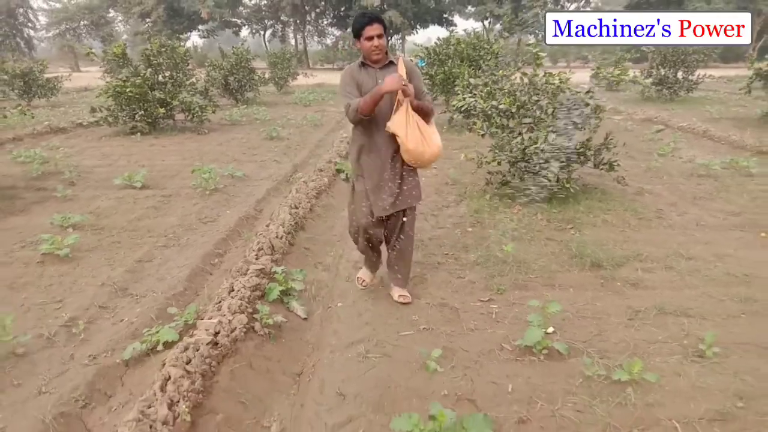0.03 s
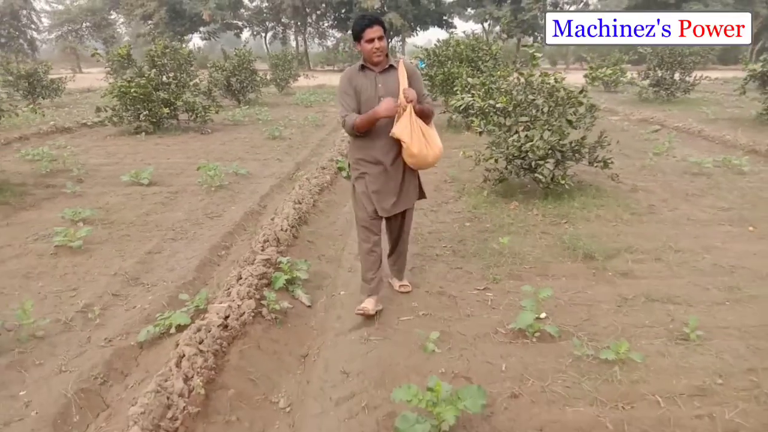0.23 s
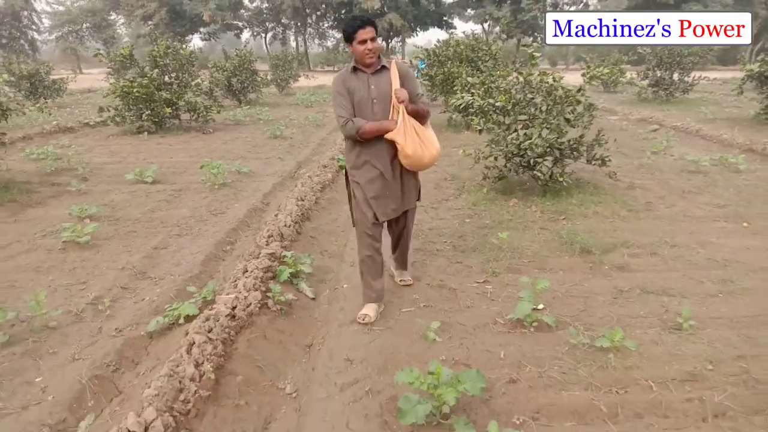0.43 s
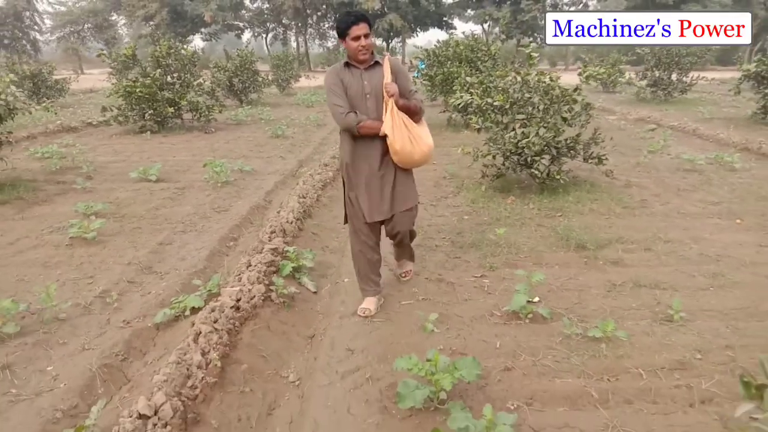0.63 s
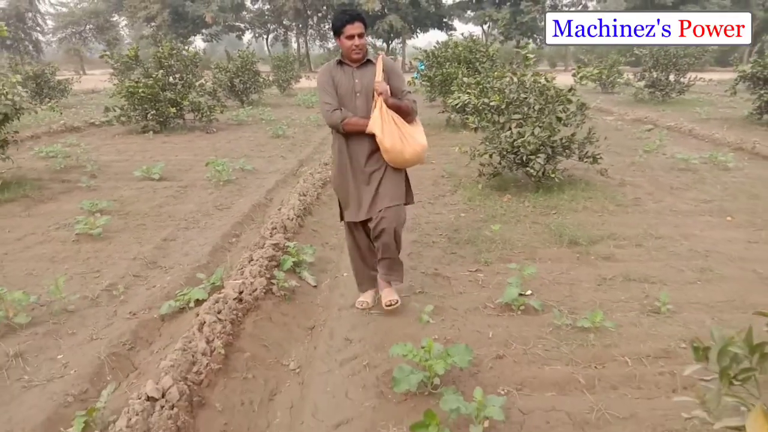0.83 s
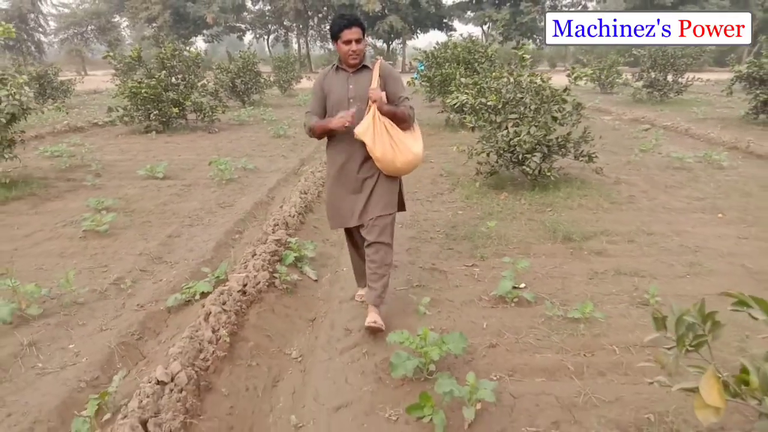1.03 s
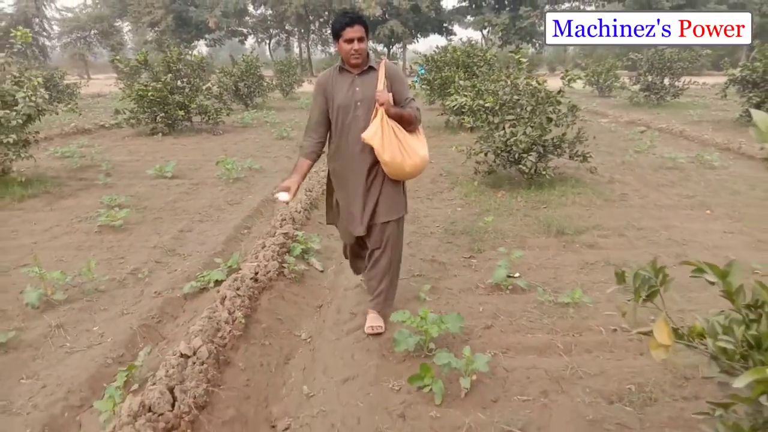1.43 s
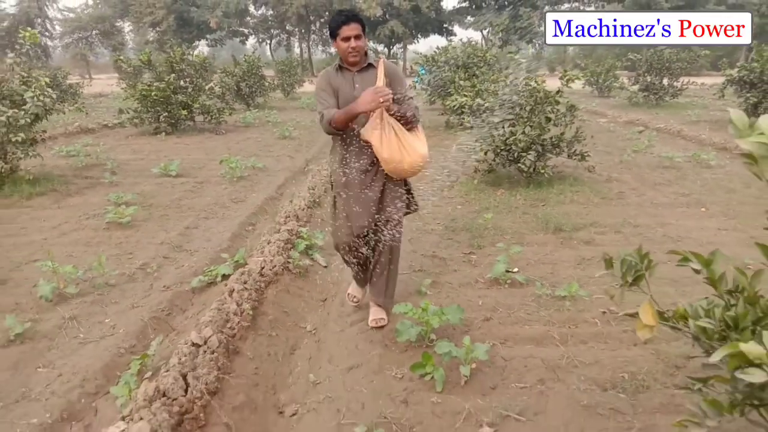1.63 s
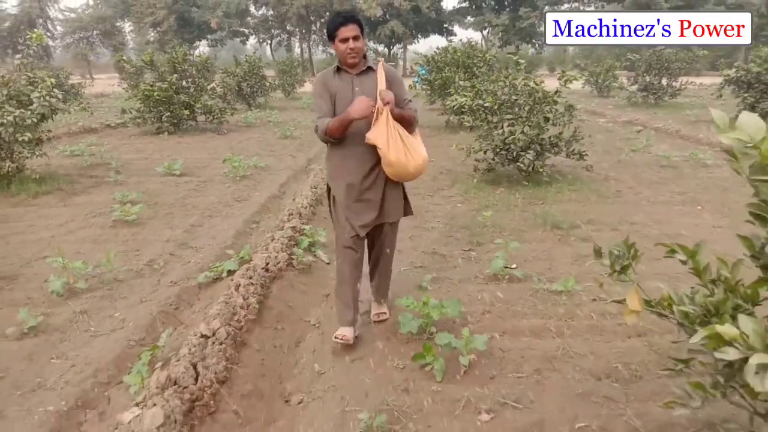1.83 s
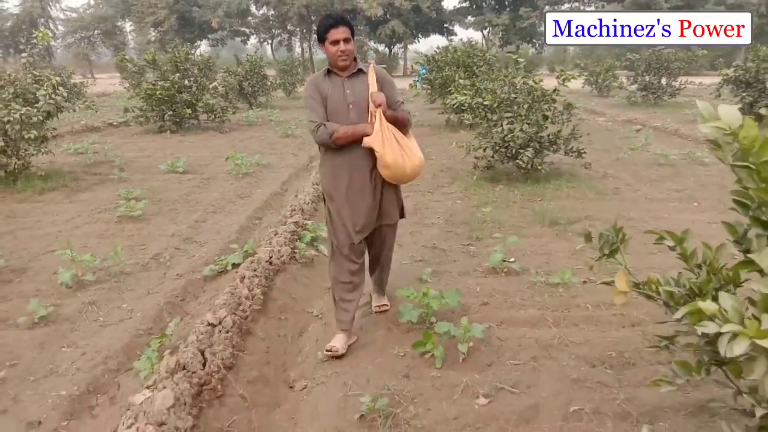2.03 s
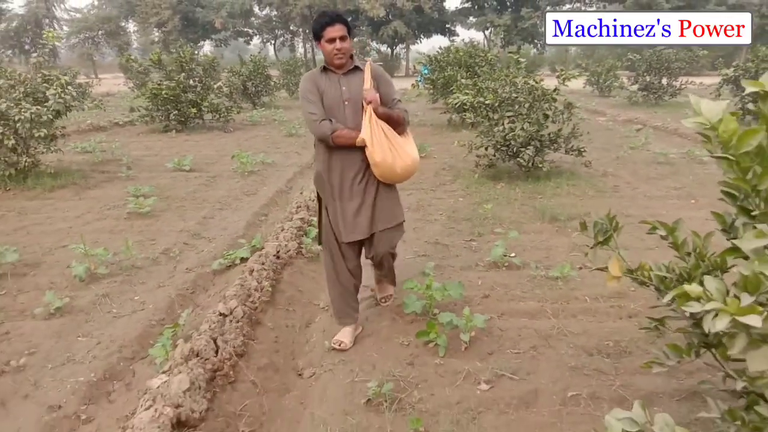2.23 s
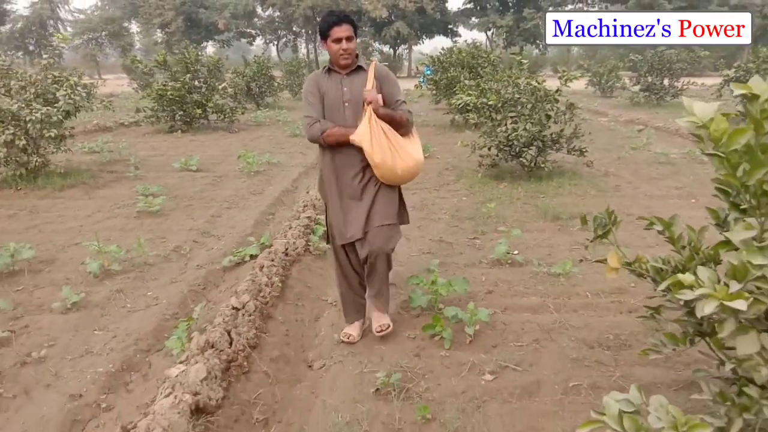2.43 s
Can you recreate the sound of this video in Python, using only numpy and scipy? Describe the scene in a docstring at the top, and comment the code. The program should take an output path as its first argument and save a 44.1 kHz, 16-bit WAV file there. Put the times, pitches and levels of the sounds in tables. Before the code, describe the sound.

Fertiliser granules thrown by hand patter on soil and leaves, a distant engine thudding.

```python
"""On a field, a farmer throws two handfuls of fertiliser granules, which patter on soil and leaves.
The patter is thousands of tiny random hits. A few granules land close by with a sharp tick,
and some knock on a camera, whose body rings hollowly. His soft steps thump and scuff.
Far off, a single-cylinder engine thuds steadily over a low rumble and quiet open air."""
import sys
import numpy as np
from scipy import signal
from scipy.io import wavfile

SR = 44100
rng = np.random.default_rng(int(sys.argv[2]) if len(sys.argv) > 2 else 0)


def materialize(psi):
    """Save the field psi as 16-bit PCM at rate SR to the path in sys.argv[1].

    A 1-D psi becomes a single channel; in a 2-D psi each row is a channel.
    """
    bounded = np.clip(np.atleast_2d(psi).T, -1, 1)
    quanta = np.round(bounded * 32767).astype(np.int16)
    wavfile.write(sys.argv[1], SR, quanta)


N = 110250

# tone of the low background rumble: pitch_hz, level_db
RUMBLE_TONE = [(20, -14), (42, -18), (55, -23), (68, 2.5), (90, 6), (150, -23), (210, -7.5), (400, -16.5),
               (900, -40.5)]
# tone of the open air: pitch_hz, level_db
AIR_TONE = [(100, -2), (400, 2.5), (800, -2), (3000, -11.5), (5000, -10.5), (9000, -25), (15000, -37)]
# tone of the faint noise that gives the background width: pitch_hz, level_db
WIDTH_TONE = [(25, 4), (80, 0.5), (160, -8), (350, -8.5), (1300, -11), (2500, -32), (6000, -31.5),
              (15000, -42)]
# the two exhaust thuds of each engine cycle: delay_s, start_hz, end_hz, rise_s, decay_s, level_db
THUDS = [(0, 353, 79, 0.0024, 0.0083, -32), (.0213, 297, 150.7, 0.0046, 0.016, -33)]
# tone of the engine's low boom: pitch_hz, level_db
BOOM_TONE = [(20, -19), (48, -22), (68, 3.5), (100, -1.5), (150, -6.5), (220, -16.5), (500, -24),
             (900, -46.5)]
# the engine's loudness drifting with distance and air: time_s, gain_db
ENGINE_DRIFT = [(0, -1), (.35, 3), (.65, 1), (1.02, 2), (1.2, 1.5), (1.38, 0), (1.55, 2), (1.649, -1.5),
                (1.9, 2), (2.15, 3.5), (2.3, 1.5), (2.5, 4)]
# soft steps on loose soil: start_s, thump_db, scuff_db
STEPS = [(.325, -41.5, -50), (.868, -47, -58.5), (1.586, -52, -64), (2.173, -65, -44)]
# tone of a sole scuffing the soil: pitch_hz, level_db
SCUFF_TONE = [(150, -23), (400, -5.5), (800, -2), (1500, -0.5), (3000, -1), (8000, -35)]
# granules knocking on the camera: start_s, level_db, low_cut_hz
KNOCKS = [(0.0964, -27.5, 200), (.1412, -38.5, 500), (0.7, -26.5, 1080), (0.894, -33, 250),
          (1.316, -20, 174), (1.977, -28.5, 700), (2.353, -35.5, 1000)]
# the notes its body rings at: pitch_hz, level_db, ring_s (time to fade by 60 dB)
BODY_NOTES = [(140, 4, 0.017), (420, -13, 0.026), (730, -4.5, 0.0046), (1283, -4.5, 0.036),
              (1560, -0.5, 0.0076), (1870, -10, 0.011), (3170, -5, 0.047)]
# granules landing close by: start_s, level_db, pitch_hz, sharpness (higher rings longer)
TICKS = [(0.1949, -19, 3150, 2.7), (0.698, -9.5, 5200, 1.6), (0.7755, -22, 6050, 3.4),
         (0.8851, -37, 3230, 5), (1.0014, -43, 3280, 5), (1.1245, -19.5, 3230, 2.3),
         (1.3166, -24.5, 5400, 4.3), (1.382, -27, 3340, 4.5), (1.5973, -31, 3330, 13),
         (1.677, -40, 4010, 1.9), (1.757, -19, 3350, 4.5), (1.771, -27, 3500, 4), (2.007, -14, 4460, 1.3),
         (2.0098, -16, 4300, 2.5), (2.0196, -9, 5300, 2.1), (2.0359, -9.5, 5250, 4.8),
         (2.0393, -39, 5360, 3), (2.1314, -21, 3860, 3.4), (2.1471, -18, 4900, 4), (2.151, -17.5, 5400, 2),
         (2.1625, -22, 3900, 4.7), (2.169, -13.5, 5000, 2), (2.2704, -24, 3200, 2.8),
         (2.3189, -22, 3360, 14), (2.353, -46, 3360, 2)]
# tone of granules hitting soil: pitch_hz, level_db
SOIL_TONE = [(260, -56), (450, -16.5), (616, -7), (715, -11), (1170, -5), (1280, 1), (1600, -7.5),
             (1750, -3.5), (1920, -5), (3380, 1), (3700, -9.5), (4360, -5.5), (6150, 0), (7250, -7.5),
             (8170, -17), (10500, -12), (13600, -22), (14800, -8.5), (16000, -22)]
# tone of granules hitting leaves: pitch_hz, level_db
LEAF_TONE = [(260, -31), (450, -11), (771, -16), (979, -12.5), (1170, -18), (1280, -11), (1420, -21),
             (3540, 2), (4700, -19.5), (6150, -10.5), (8670, -28.5), (13200, -26.5), (15100, -26),
             (16000, -25)]
# showers of granules: start_s, rise_s, hold_s, fall_db_per_s, level_db, peak_hits_per_s, leaf_share (0-1)
SHOWERS = [(0.191, 0.074, 0.11, 58.5, -31, 8300, 0.07), (0.605, 0.17, 0.16, 24, -44.5, 2400, 0.18),
           (1.761, .014, 0.013, 173, -32.5, 2900, 0.94), (1.772, 0.056, .04, 34.5, -39, 1600, 0.16),
           (2.117, 0.067, 0.75, 17, -53.5, 830, 0.6)]


def amp(db):
    """Turns decibels into a factor to multiply a sound by."""
    return 10 ** (np.asarray(db) / 20)


def unit(x):
    """Scales a sound to an average power of 1."""
    return x / np.sqrt(np.mean(x ** 2) + 1e-20)


def seconds(size):
    """The time of each sample in a sound."""
    return np.arange(size) / SR


def add(mix, start_s, sound):
    """Adds a sound to the mix at the given time."""
    part = mix[max(round(start_s * SR), 0):][:len(sound)]
    part += sound[:len(part)]


def ring(x, hz, sharpness):
    """Makes a sound ring around one pitch."""
    return signal.lfilter(*signal.iirpeak(hz, sharpness, SR), x)


def colour(x, tone, size=4096):
    """Filters a sound to follow a tone table; plain noise keeps its overall power."""
    table_hz, table_db = np.transpose(tone)
    hz = abs(np.fft.fftfreq(size, 1 / SR))
    log_gain = np.log(amp(np.interp(np.log(hz + 1), np.log(table_hz + 1), table_db)))
    spectrum = np.exp(np.conj(signal.hilbert(log_gain)))  # so nothing sounds before its hit
    response = np.fft.ifft(spectrum).real[:size // 2]
    return signal.oaconvolve(x, response / np.linalg.norm(response))[:len(x)]


def linger(power, decay_s):
    """Spreads each spike of power into a fading tail with the same energy."""
    kept = np.exp(-2 / (decay_s * SR))
    return signal.lfilter([1 - kept], [1, -kept], power)


def swell(t, peak_s):
    """Rises to 1 at peak_s, then dies away."""
    return t / peak_s * np.exp(1 - t / peak_s)


def open_air(level_db=-67):
    """Steady noise makes a low rumble and the hush of the field."""
    rumble = colour(rng.standard_normal(N), RUMBLE_TONE)
    air = colour(rng.standard_normal(N), AIR_TONE)
    return amp(level_db) * (rumble + air)


def engine(first_s=0.01795, cycle_s=0.07535, glide_s=0.0023, clank_hz=1244, clatter_hz=2650):
    """Each cycle brings two exhaust thuds that drop in pitch, a boom, a metal clank and faint clatter."""
    out, t = np.zeros(N), seconds(5000)
    for start_s in np.arange(first_s, N / SR, cycle_s):
        for delay_s, start_hz, end_hz, rise_s, decay_s, db in THUDS:
            extra_db, detune = rng.normal(0, 1.07), rng.normal(0, 0.011)  # no two thuds are alike
            hz = (end_hz + (start_hz - end_hz) * np.exp(-t / glide_s)) * (1 + detune)
            shape = (1 - np.exp(-t / rise_s)) * np.exp(-t / decay_s)
            thud = shape * np.sin(2 * np.pi * np.cumsum(hz) / SR)
            add(out, start_s + delay_s, amp(db + extra_db) * thud)
        clank_noise, clatter_noise, boom_noise = rng.standard_normal((3, len(t)))
        clank = unit(ring(ring(clank_noise, clank_hz, 11.5), clank_hz, 23))
        clank *= amp(-49) * np.exp(-t / 0.014)
        clatter = unit(ring(ring(clatter_noise, clatter_hz, 1.75), clatter_hz, 1.75))
        clatter *= amp(-56.5) * np.exp(-t / 0.033)
        fade_in = 1 - np.exp(-t / 0.0033)
        boom = amp(-49.5) * colour(boom_noise, BOOM_TONE) * swell(t, peak_s=0.016)
        add(out, start_s, (clank + clatter) * fade_in + boom)
    out = signal.lfilter(*signal.butter(1, 35, "high", fs=SR), out)  # softens the bass below 35 Hz
    drift_db = np.interp(seconds(N), *np.transpose(ENGINE_DRIFT))
    return out * amp(drift_db)


def steps(thump_hz=75):
    """The heel lands with a low thump and the sole makes a gritty scuff."""
    out, t = np.zeros(N), seconds(9000)
    for start_s, thump_db, scuff_db in STEPS:
        grit = rng.standard_normal(len(t)) ** 3  # cubing makes the noise crackly
        scuff = amp(scuff_db) * swell(t, peak_s=0.017) * unit(colour(grit, SCUFF_TONE))
        thump = amp(thump_db) * swell(t, peak_s=0.019) * np.sin(2 * np.pi * thump_hz * t)
        add(out, start_s, thump + scuff)
    return out


def knocks(dull_above_hz=1860, bright_db=-21.5):
    """The camera body rings briefly and hollowly when a granule strikes it."""
    out, t = np.zeros(N), seconds(4000)
    bright = -sum(amp(db - 60 * t / ring_s) * np.sin(2 * np.pi * hz * t) for hz, db, ring_s in BODY_NOTES)
    dull = signal.sosfilt(signal.butter(6, dull_above_hz, fs=SR, output="sos"), bright)
    knock = dull + amp(bright_db) * bright
    for start_s, db, low_cut_hz in KNOCKS:
        low_cut = signal.butter(2, low_cut_hz, "high", fs=SR)
        add(out, start_s, amp(db) * signal.lfilter(*low_cut, knock))
    return out


def ticks(decay_s=0.0012, tail_s=0.012, tail_db=-17, crack_db=-10):
    """A granule landing close by gives a sharp crack and a short ring, purer on a leaf."""
    out, t = np.zeros(N), seconds(1200)
    shape = np.exp(-t / decay_s) + amp(tail_db) * np.exp(-t / tail_s)
    for start_s, db, hz, sharpness in TICKS:
        burst = rng.choice([-1., 1.], len(t)) * shape
        burst[0] += 3  # the moment of contact
        crack = amp(crack_db) * np.diff(burst, prepend=0) / sharpness
        tick = ring(burst, hz, sharpness) + crack
        add(out, start_s, 2.05 * amp(db) * tick / np.linalg.norm(tick))
    return out


def patter(power, hits_per_s, tone, spread_db=3, pitch_count=10):
    """Granules hit at random, some harder than others: each is a snap, a tiny pitched burst and a tail."""
    strength = unit(amp(spread_db * np.minimum(rng.exponential(1, N), 4)))
    lands = rng.random(N) < hits_per_s / SR
    hits = strength * lands * np.sqrt(power * SR / (hits_per_s + 1e-6))  # the hits share the power
    pitch_group, out = rng.integers(0, pitch_count, N), np.zeros(N)
    for group, hz in enumerate(np.geomspace(1500, 13000, pitch_count)):
        group_hits = hits * (pitch_group == group)
        contact = linger(group_hits ** 2, decay_s=0.00086)
        scatter = amp(2) ** 2 * linger(group_hits ** 2, decay_s=0.0072)  # echo off ground and bushes
        snap = 0.87 * group_hits * rng.choice([-1, 1], N)
        burst = snap + np.sqrt(contact + scatter) * rng.standard_normal(N)
        out += 0.47 * burst + ring(burst, hz, sharpness=2.25)
    return colour(out, tone)


def showers(settle_after_s=1.084, settle_fade_s=0.045):
    """Each shower of granules swells, holds and thins out, falling partly on soil and partly on leaves."""
    soil_power, leaf_power, hits_per_s = np.zeros((3, N))
    for start_s, rise_s, hold_s, fall_db_per_s, db, peak_hits_per_s, leaf_share in SHOWERS:
        t = np.maximum(seconds(N) - start_s, 0)
        fallen_db = fall_db_per_s * np.maximum(t - rise_s - hold_s, 0)
        flow = np.minimum(t / rise_s, 1) * amp(-fallen_db) ** 2
        flow *= (1 - np.tanh((t - settle_after_s) / settle_fade_s)) / 2  # the shower dies out
        soil_power += (1 - leaf_share) * flow * amp(db) ** 2
        leaf_power += leaf_share * flow * amp(db) ** 2
        hits_per_s += peak_hits_per_s * flow ** 0.6  # a weaker flow has fewer and softer hits
    return patter(soil_power, hits_per_s, SOIL_TONE) + patter(leaf_power, hits_per_s / 2, LEAF_TONE)


def scene():
    """Every source sits in the middle; faint noise adds a little width between left and right."""
    middle = showers() + ticks() + knocks() + steps() + engine() + open_air()
    side = amp(-78) * colour(rng.standard_normal(N), WIDTH_TONE)
    return np.array([middle + side, middle - side])


def record(dry):
    """Cuts away the highest treble, above 15900 Hz."""
    treble_cut = signal.firwin(401, 15900, window=("kaiser", 8), fs=SR)
    return signal.oaconvolve(dry, treble_cut[None], "same")


dry = scene()
out = record(dry)
materialize(out)
```